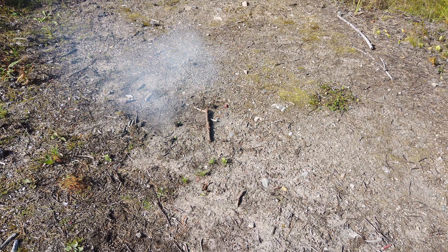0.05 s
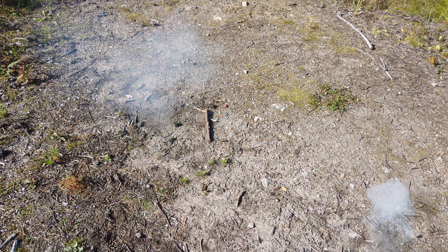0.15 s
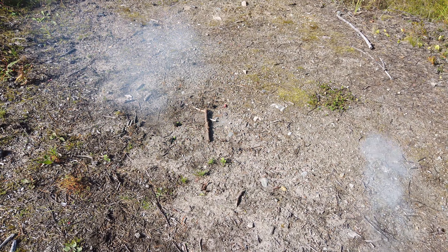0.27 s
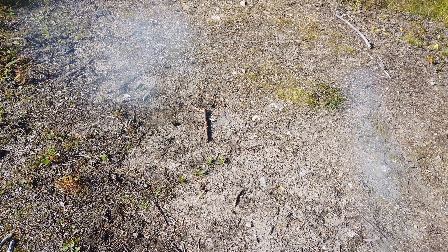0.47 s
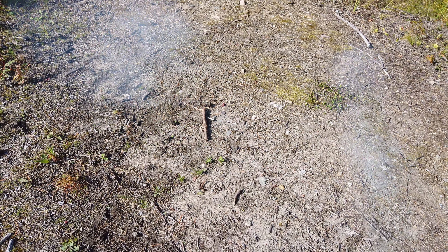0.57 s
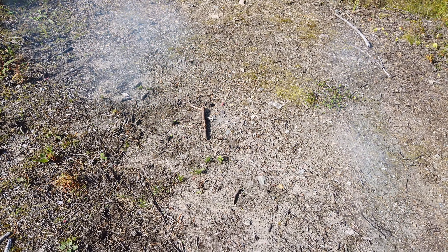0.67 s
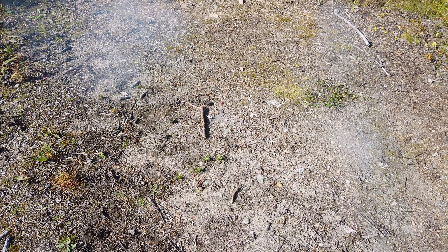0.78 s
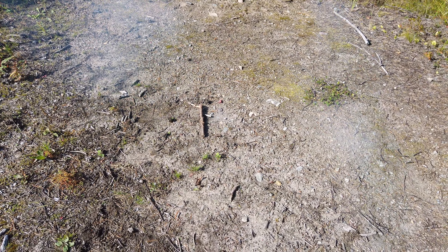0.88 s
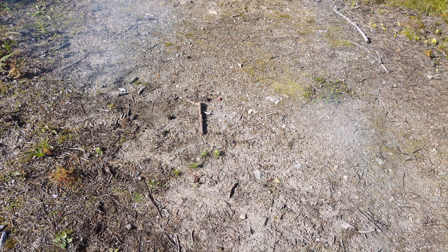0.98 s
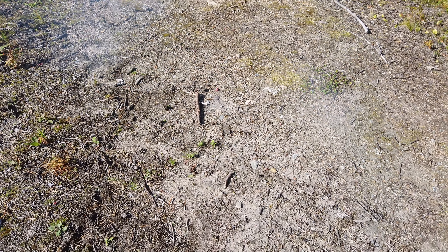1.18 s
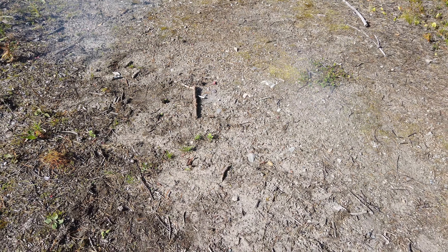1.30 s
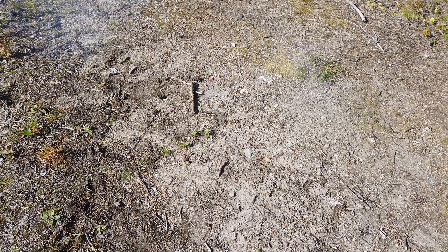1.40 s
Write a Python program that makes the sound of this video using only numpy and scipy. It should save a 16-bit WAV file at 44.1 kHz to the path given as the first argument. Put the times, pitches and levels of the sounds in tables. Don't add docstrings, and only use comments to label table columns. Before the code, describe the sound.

A firecracker cracks once, sharp and close, echoing through a quiet forest clearing before fading

```python
import sys
import numpy as np
from scipy import signal
from scipy.fft import rfft, irfft, next_fast_len
from scipy.io import wavfile
from scipy.ndimage import map_coordinates

SR = 44100
rng = np.random.default_rng(int(sys.argv[2]) if len(sys.argv) > 2 else 0)


def invert_db(x):
    u = np.asarray(x, float) / 20
    return 10 ** u


def wrap_up_sound(samples):
    columns = np.atleast_2d(samples).T
    tamed = np.clip(columns, -1, 1)
    steps = np.round(tamed * 32767).astype(np.int16)
    wavfile.write(sys.argv[1], SR, steps)


N = 63945
BANG_S = .2202

# (frequency [Hz], correlation [-1..1])
FAR_ALIKE = [(60, 0.99), (150, 0.83), (380, -2.4), (950, 1), (2380, 0.14), (5980, -0.23), (15000, 1)]
# (frequency [Hz], correlation [-1..1])
NEAR_ALIKE = [(40, .2), (90, .3), (160, .75), (700, .75), (1400, .88), (2600, .15), (6000, .05),
              (14000, -.1)]


def along(points, hz):
    f, v = np.transpose(points)
    return np.interp(np.log(hz + 1), np.log(f + 1), v)


def wobble(rate):
    knots = rng.standard_normal(int(N * rate / SR) + 4)
    return map_coordinates(knots, [np.arange(N) * rate / SR])


def filtered(x, response):
    m = next_fast_len(N + 8192)
    return irfft(rfft(x, m) * response(np.fft.rfftfreq(m, 1 / SR)), m)[..., :N]


def rush(spectrum, alike):
    closed = [(spectrum[0][0] * .7, -120)] + list(spectrum) + [(spectrum[-1][0] * 1.3, -120)]

    def mid_side(hz):
        turn = np.arccos(np.clip(along(alike, hz), -1, 1)) / 2
        return invert_db(along(closed, hz)) * [np.cos(turn), np.sin(turn)]

    mid, side = filtered(rng.standard_normal((2, N)), mid_side)
    pair = np.array([mid + side, mid - side])
    return pair / np.sqrt(np.mean(pair ** 2))


def swell(start_s, rise_s, t60):
    t = np.maximum(np.arange(N) / SR - start_s, 0)
    return (1 - np.exp(-t / rise_s)) * invert_db(-60 * t / t60)


def dying(x, start_s, rise_s, decays):
    hz, t, z = signal.stft(x, SR, nperseg=256)
    fade_db = -60 * (t - start_s).clip(0) / along(decays, hz)[:, None]
    faded = signal.istft(z * invert_db(fade_db), SR, nperseg=256)[1]
    return faded[:, :N] * swell(start_s, rise_s, np.inf)


def still_air():
    # (frequency [Hz], density [dB per Hz])
    air = [(59, -26), (100, -3.5), (285, -8.5), (549, -6.5), (897, -13.5), (1040, -6.5), (5000, -24.5),
           (6500, -53), (11000, -120)]
    # (frequency [Hz], correlation [-1..1])
    air_alike = [(40, .9), (200, .2), (1200, 0), (4000, 0.019)]
    # (frequency [Hz], density [dB per Hz])
    rumble = [(22, -7.5), (33, 0.5), (44, -1), (75, -16.5), (130, -25.5)]
    # (frequency [Hz], density [dB per Hz])
    hiss = [(2500, 0), (5000, -5), (7000, -8), (9400, -8), (9900, -24), (15500, -26)]
    quiet = invert_db(-71.5) * rush(air, air_alike)
    low = invert_db(-64 + 2.3 * wobble(6.6)) * rush(rumble, [(40, .95), (100, 0.62)])
    return quiet + low + invert_db(-87.5) * rush(hiss, [(5000, 0.0032)])


def drone():
    # (time [s], pitch [Hz], level [dB])
    firing = [(0, 37.2, -59), (.17, 35.73, -60), (.3, 35.3, -47.5), (0.4, 35.45, -53),
              (0.524, 36.03, -56.5), (0.784, 35.63, -49), (0.81, 36.06, -55.5), (0.842, 35.67, -47.5),
              (0.876, 35.4, -52), (1.098, 35.74, -46.5), (1.19, 36.57, -54.5), (1.318, 36.06, -50),
              (1.44, 34.47, -49)]
    s, hz, db = np.transpose(firing)
    t = np.arange(N) / SR
    turn = 2 * np.pi * np.cumsum(np.interp(t, s, hz)) / SR
    turn = turn - turn[-1] + .1
    octave = invert_db(-27 + 4 * wobble(14)) * np.sin(2 * turn)
    return np.sqrt(2) * invert_db(np.interp(t, s, db)) * (np.sin(turn) + octave)


def earlier_bang():
    # (frequency [Hz], density [dB per Hz])
    ring = [(240, -37.5), (400, -5.5), (428, -17.5), (957, -3), (1110, -6), (2370, -7), (6000, -29),
            (7800, -60.5), (13200, -120)]
    t60 = 1.5
    t = np.arange(N) / SR
    swell_db = 4.5 * (t / BANG_S).clip(0, 1) ** 2
    level_db = -71.5 + swell_db - 60 * (t - BANG_S).clip(0) / t60
    return invert_db(level_db + 1.2 * wobble(77)) * rush(ring, FAR_ALIKE)


def far_slope():
    # (frequency [Hz], density [dB per Hz])
    slope = [(240, -57), (400, -18), (448, -31), (568, -6), (1710, 5.5), (2680, -3), (3990, -34),
             (6000, -26), (7800, -74), (13200, -120)]
    start_s, rise_s, t60 = .94, .07, .95
    shape = swell(start_s, rise_s, 2 * t60) ** 2
    return invert_db(-50 + .8 * wobble(260)) * shape * rush(slope, FAR_ALIKE)


def deep_wood():
    # (frequency [Hz], density [dB per Hz])
    wood = [(180, -34), (300, -22), (513, -11), (978, -7), (2200, -3.5), (3660, -13.5), (6000, -20),
            (9000, -27)]
    # (frequency [Hz], time to fall 60 dB [s])
    wood_t60 = [(250, 0.76), (550, .95), (1200, 1.22), (2500, 1.073), (5000, .85), (9000, 0.76)]
    rise_s = 0.013
    return invert_db(-30.5 + 0.24 * wobble(200)) * dying(rush(wood, FAR_ALIKE), BANG_S, rise_s, wood_t60)


def near_scatter():
    # (frequency [Hz], density [dB per Hz])
    scatter = [(50, -20), (500, -14), (900, -10.5), (1600, -9), (2800, -9.5), (3500, -16), (8500, -18.5),
               (11300, -18), (16000, -28.5)]
    # (frequency [Hz], time to fall 60 dB [s])
    scatter_t60 = [(60, 0.37), (150, .33), (400, 0.35), (1500, .45), (4000, 0.38), (8000, .34),
                   (11500, .36), (14500, 0.3)]
    grain_db, grain_fade_s = 3, 0.28
    after = (np.arange(N) / SR - BANG_S).clip(0)
    grains = grain_db * np.exp(-after / grain_fade_s) * wobble(450)
    return invert_db(-13 + grains) * dying(rush(scatter, NEAR_ALIKE), BANG_S, .0003, scatter_t60)


def grit():
    # (time [s], level [dB], centre [Hz], width [Hz], rise [s], time to fall 60 dB [s])
    patters = [
        (0.5665, -50.5, 12800, 4700, .012, 0.15),
        (.735, -73.5, 10900, 700, .015, .25),
        (.756, -66, 11000, 800, .003, .04),
        (0.52, -61, 4700, 2200, 0.023, .4),
    ]
    skirt_db = -12
    out = np.zeros((2, N))
    for s, db, hz, width, rise_s, t60 in patters:
        skirt = [(hz * .6, skirt_db - 6), (hz - width * .6, skirt_db)]
        band = [(hz - width / 2, 0), (hz + width / 2, -3)]
        shape = swell(s, rise_s, 2 * t60) ** 2
        out += invert_db(db + 2.4 * wobble(700)) * shape * rush(skirt + band, [(hz, .3)])
    return out


def lead_hiss():
    # (frequency [Hz], density [dB per Hz])
    lead_noise = [(59, -35.5), (100, -2.5), (2470, -9), (3050, -4), (3320, -9), (9210, -16), (10900, -10),
                  (16000, -22.5)]
    start_s, lead_s = .2012, .191
    ramp = (np.arange(N) / SR - start_s) / (BANG_S - start_s)
    main = swell(start_s, .0022, np.inf) ** 0.77
    lead = invert_db(-15) * swell(lead_s, .009, np.inf) ** 2
    level = invert_db(-29 + 3 * ramp.clip(0, 1))
    return (ramp < 1) * (main + lead) * level * rush(lead_noise, NEAR_ALIKE)


def blast_and_echoes():
    # (time [s], peak [dB], pitch [Hz], cycles to fade, left over right [dB])
    arrivals = [(.2201, -11, 2900, 5, 6), (.22185, -6.5, 640, 2.2, 0), (.2237, -9, 2900, 7, -2),
                (.2287, -7, 1050, 2.2, 3), (.2324, -6.5, 1300, 1.8, 2), (.23965, -8.5, 1900, 2.4, 1),
                (.2444, -7, 1600, 7, 0), (.2470, -2, 1650, 4, 0), (.2212, -15, 470, 2.5, 1.5),
                (.2206, -23, 190, 1.8, 2.2), (.2203, -32, 26, 1.3, 0), (.2505, -13, 2700, 5, 1),
                (.2535, -15, 900, 2.4, 0), (.2587, -14, 1800, 3, 0), (.2622, -18, 2500, 3, 0),
                (.2474, -17, 5500, 2, 0), (.2690, -13, 1900, 6, 0), (.2768, -14, 2300, 6, 0),
                (.2815, -18, 2400, 6, 0), (.2965, -19, 2200, 6, 0), (1.043, -55, 1650, 12, 0),
                (1.14, -51, 1600, 3, 0)]
    lag_s_per_db = 1.5e-5
    lead_s, length = .001, SR // 20
    out, side = np.zeros((2, N)), np.array([[.5], [-.5]])
    for s, db, hz, cycles, pan_db in arrivals:
        t = (np.arange(length) / SR - lead_s + side * pan_db * lag_s_per_db).clip(0)
        u = t * hz / cycles
        shape = (1 - np.exp(-8 * u)) * np.exp(-3 * u * u)
        level = invert_db(db + 3.5 + side * pan_db)
        out[:, round((s - lead_s) * SR):][:, :length] += level * np.sin(2 * np.pi * hz * t) * shape
    return out


def scene():
    background = still_air() + drone() + earlier_bang()
    answer = far_slope() + deep_wood() + near_scatter()
    return background + answer + grit() + lead_hiss() + blast_and_echoes()


def band_limit(x):
    return signal.sosfilt(signal.butter(12, 16470, fs=SR, output="sos"), x)


def record(dry):
    top_hz = 15800
    ends = np.linspace(dry[:, 0], dry[:, -1], N, axis=1)
    x = ends + filtered(dry - ends, lambda hz: 1 / (1 + (hz / top_hz) ** 90))
    clipped = x / (1 + np.abs(x) ** 8) ** (1 / 8)
    return band_limit(clipped)


dry = scene()
out = record(dry)
wrap_up_sound(out)
```